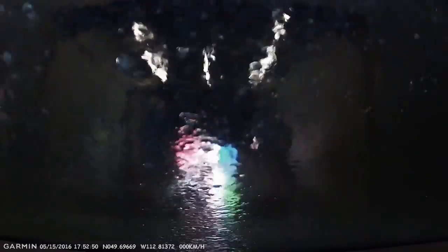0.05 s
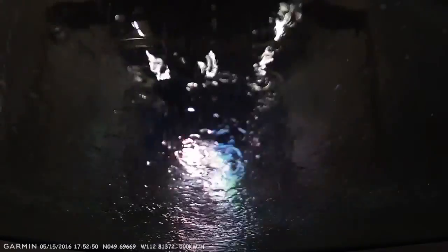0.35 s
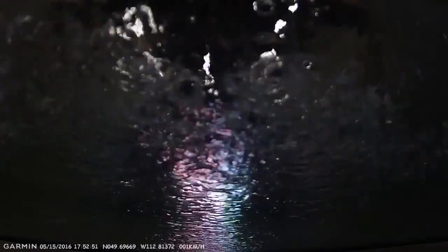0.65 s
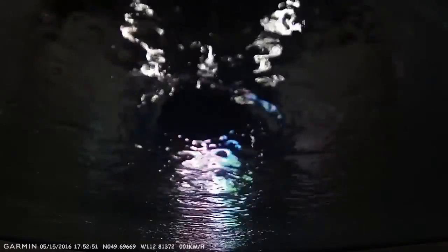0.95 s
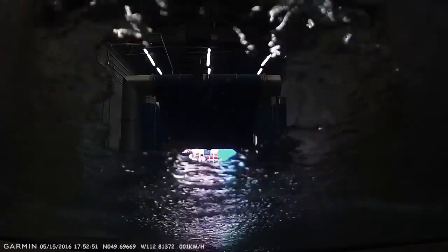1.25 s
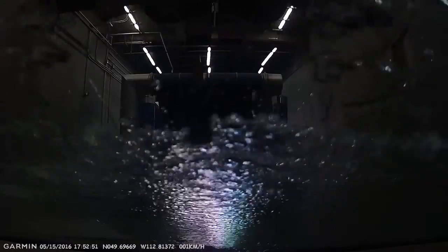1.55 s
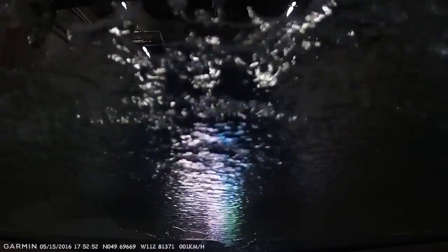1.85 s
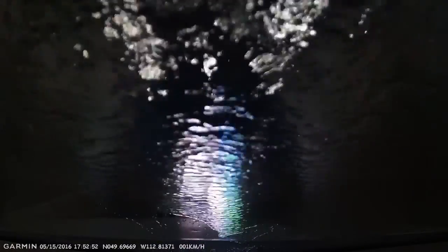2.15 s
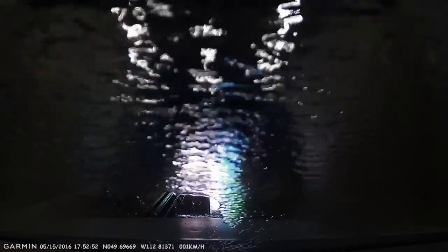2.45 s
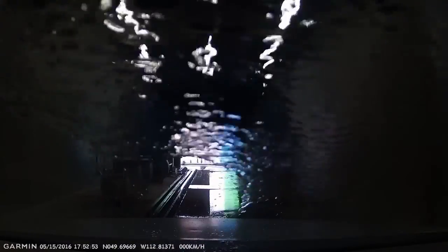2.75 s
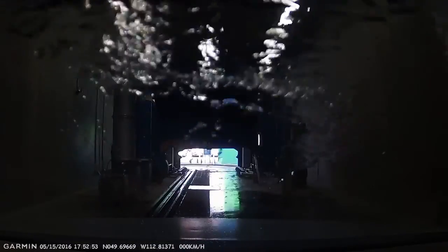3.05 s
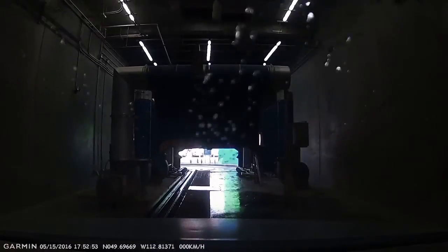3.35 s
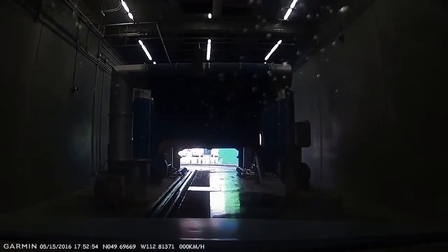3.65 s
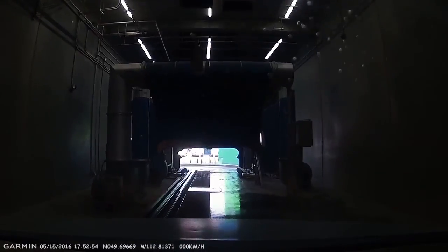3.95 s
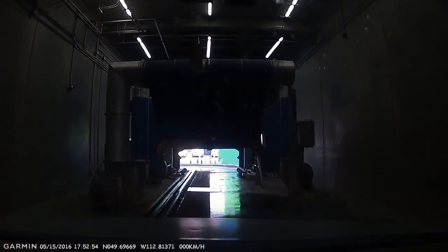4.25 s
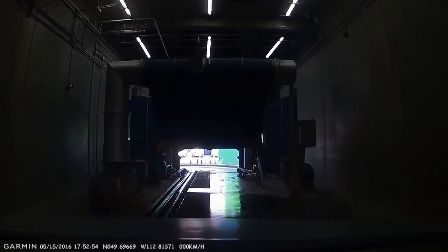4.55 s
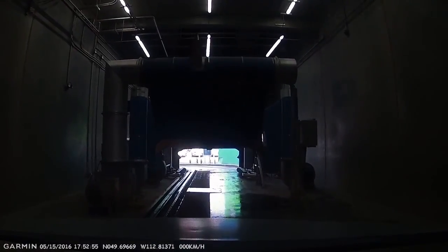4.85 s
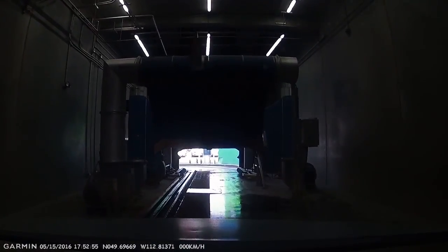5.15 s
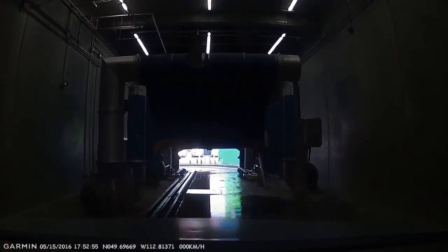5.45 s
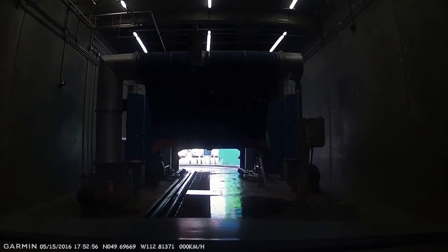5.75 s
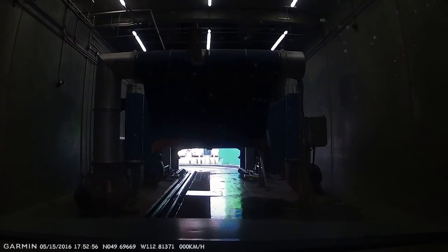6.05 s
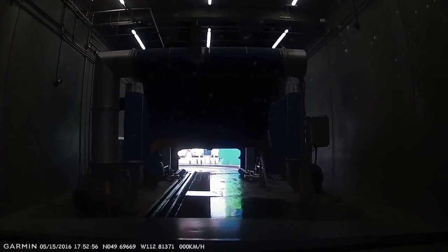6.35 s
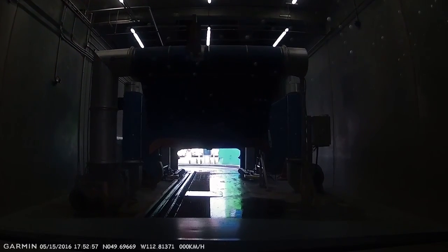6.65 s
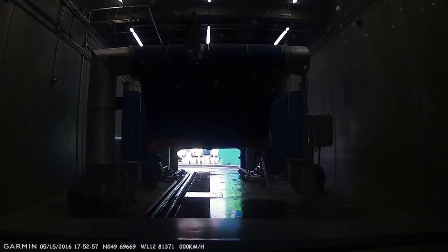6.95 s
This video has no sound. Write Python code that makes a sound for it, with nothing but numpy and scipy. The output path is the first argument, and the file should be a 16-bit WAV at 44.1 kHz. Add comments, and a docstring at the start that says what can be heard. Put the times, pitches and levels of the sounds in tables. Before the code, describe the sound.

Muffled car wash jets, a constant high hum and deep buffeting air, heard from a closed car as the dryers' low boom grows.

```python
"""Car wash, from inside the car

One microphone behind the windscreen as the car creeps out of the rinse and towards the dryers.
Out in the tunnel a blower hums on one high note and jets rush; close by, water sprays on the glass
and the air stream rumbles and thumps on the body. Faint ticks and a thin hiss come and go. As the
dryers come near, the roar over the roof grows and the cabin starts to boom on a low, throbbing drone."""
import sys
import numpy as np
from scipy import signal
from scipy.fft import rfft, irfft, next_fast_len
from scipy.io import wavfile
from scipy.ndimage import uniform_filter1d, map_coordinates

SR = 44100
rng = np.random.default_rng(int(sys.argv[2]) if len(sys.argv) > 2 else 0)


def transcribe(u):
    """Save the signal u as a 16-bit wav file named by the first command-line argument.

    u: samples, shape (n,) or (channels, n), limited to [-1, 1]; the rate is SR.
    q: integer samples, one column per channel.
    """
    v = np.clip(np.atleast_2d(u).T, -1, 1)
    q = np.round(v * 32767).astype(np.int16)
    wavfile.write(sys.argv[1], SR, q)


N = 313551

# the blower's blade note and its odd overtone: multiple, relative_db
BLADE_PARTIALS = [(1, 1), (3, -28.5)]
# quiet spots of its standing wave along the tunnel: centre_s, half_width_s, depth_db
BLADE_NULLS = [(.12, 0.13, 11.5), (.33, 0.05, 9), (.42, .045, 6.5), (.96, 0.1, 5), (1.55, 0.43, 6.5),
               (2.55, 0.11, 3.5), (2.8, 0.12, 8.5), (3.33, 0.18, 3.5), (4.12, 0.16, 9.5), (4.57, 0.16, 2),
               (5.18, 0.13, 12.5), (6.06, 0.19, 3.5), (6.5, 0.2, 1.5)]
# spots where its octave swells: centre_s, half_width_s, rise_db
OCTAVE_SWELLS = [(2.05, 0.36, 9), (3.86, 0.2, 10.5), (4.2, .12, 8), (4.6, .1, 5), (6.86, .15, 8)]
# fainter whines of other fans: pitch_hz, level_db
FAN_WHINES = [(1290, -56), (1421, -53.5), (2130, -62), (2368, -62)]

# deep buffeting as the car enters the air stream: time_s, level_db
BUFFET_LEVELS = [(0, -27), (.95, -24), (1.35, -19.5), (2.05, -19.5), (2.45, -17.7), (2.95, -20),
                 (3.45, -17), (3.9, -18), (4.1, -21), (4.35, -19), (4.8, -20), (5.3, -17.5), (5.6, -17.7),
                 (6.3, -20), (7.11, -17.5)]
# air over the roof and jets in the tunnel: time_s, relative_db
ROAR_LEVELS = [(0, -28.5), (.95, -29), (1.6, -25.5), (2.1, -24.5), (2.25, -26.3), (2.72, -26),
               (3.15, -23.5), (4, -26.5), (4.45, -27.5), (5.15, -26), (5.9, -20), (6.07, -21),
               (6.62, -19.5), (7.11, -18)]
JET_LEVELS = [(0, -35.5), (.9, -35), (1.75, -35), (1.95, -34), (2.7, -34.5), (3.35, -31.5), (3.85, -31.5),
              (4.1, -34.5), (4.9, -33), (5.1, -34), (5.5, -33), (6.7, -31.5), (7.11, -32.5)]
# the cabin's low resonances: centre_hz, half_width_hz, gain_db
CABIN_MODES = [(106, 9.1, -12.5), (124.6, 8.7, 2.5), (144.3, 7, -4.5), (179.6, 8.6, 0)]

# air and water as heard through the closed car: frequency_hz, density_db
BUFFET_SPECTRUM = [(5, -21), (14, -4), (26, -2), (46, 3.5), (59, 8), (78, 4), (90, 2.5), (105, 1),
                   (130, -4.5), (200, -29.5), (320, -83)]
ROAR_SPECTRUM = [(90, -26.5), (140, -3), (180, -0.5), (210, -1), (238, 0.5), (280, -4.5), (335, -3),
                 (420, -7.5), (510, -15.5), (700, -24.5), (1400, -78)]
JET_SPECTRUM = [(300, -6), (520, 2), (640, 3), (740, 0.5), (900, -4.5), (1100, -5.5), (1400, -8),
                (1650, -9.5), (1900, -18), (3500, -108)]
SPRAY_SPECTRUM = [(900, -8.5), (1600, -6), (2000, 5), (2450, 4.5), (2800, 2.5), (3200, 1), (3700, -5),
                  (4300, -12), (4900, -21.5), (5500, -43), (6800, -53), (15000, -64.5)]
RINSE_SPECTRUM = [(2000, -10.5), (3700, 9.5), (4700, 4), (5600, -17), (6500, -26), (9000, -43.5)]

# brief, faint high ticks in the hiss: start_s, relative_db
TICKS = [(.075, -69), (.325, -57), (.485, -56), (.785, -57), (.982, -49), (1.157, -59), (1.527, -57),
         (1.952, -51), (2.152, -56), (2.43, -63), (2.478, -49), (2.645, -58), (4.133, -56), (4.547, -59),
         (4.83, -57), (5.087, -55), (5.202, -55)]
# the colour of those ticks and of the duller patter between them: frequency_hz, density_db
TICK_SPECTRUM = [(2500, -12), (4200, 2), (5500, 5), (6100, -8), (7500, -26), (10000, -50.5)]
PATTER_SPECTRUM = [(2500, -12), (4000, 0), (5000, 0), (5500, -10), (6200, -35), (9000, -60)]
# single gusts against the body: centre_s, relative_db
GUSTS = [(1.27, -22), (1.67, -19), (3.48, -12), (4.18, -19.5), (4.919, -15), (5.28, -18.5), (5.55, -14.5),
         (5.98, -14), (6.88, -15.5)]
# a faint, thin high hiss that comes and goes: start_s, end_s, level_db
HISS_SPELLS = [(2.503, 3.827, -57), (5.52, 6.75, -56.5)]
# the colour of that hiss: frequency_hz, density_db
HISS_SPECTRUM = [(3000, -20), (4400, 6), (5300, 6), (6500, 2), (8000, 0), (12000, -1), (15800, -2.5)]
# the roof panel's resonances: centre_hz, half_width_hz, gain_db
ROOF_MODES = [(135, 20, -2), (202, 16, -4.5), (264, 9, 4.5), (316, 12, 4.5)]
# throbs of the cabin's boom: start_s, length_s, relative_db, pitch_hz
THROBS = [(5.05, .1, -14.5, 135), (5.209, 0.072, -21.5, 134), (5.293, 0.059, -15, 133.1),
          (5.412, 0.072, -20.5, 124.6), (5.581, 0.038, -6.5, 126.8), (5.633, 0.068, -12, 132.3),
          (5.776, 0.061, -11, 135), (5.895, 0.062, -5.5, 133.4), (6.157, 0.055, -15, 127.7),
          (6.249, 0.13, -15.5, 122.7), (6.43, 0.07, -11.5, 133.8), (6.534, .15, -10.5, 131),
          (6.703, 0.042, -15, 137.7), (6.887, .05, -14.5, 139.7), (6.998, 0.1, -15, 137)]

TIME_S = np.arange(N) / SR


def amp(db):
    """Decibels to gain."""
    return 10 ** (np.asarray(db) / 20)


def unit(x):
    """Scale to rms 1."""
    return x / np.sqrt(np.mean(x ** 2) + 1e-20)


def curve(points):
    """Straight lines through (time_s, value) points, one value a sample."""
    return np.interp(TIME_S, *np.transpose(points))


def passing(centre_s, half_width_s):
    """A bell curve of height 1: the car goes by a spot."""
    return np.exp(-((TIME_S - centre_s) / half_width_s) ** 2)


def wobble(per_s):
    """A smooth random curve with per_s knots a second."""
    knots = rng.standard_normal(int(N * per_s / SR) + 4)
    return map_coordinates(knots, [TIME_S * per_s])


def filtered(x, response):
    """x times a response of frequency."""
    size = next_fast_len(N + SR // 2)
    return irfft(rfft(x, size) * response(np.fft.rfftfreq(size, 1 / SR)), size)[:N]


def coloured(x, spectrum):
    """x shaped by a spectrum on a log frequency axis, at rms 1."""
    points_hz, db = np.transpose(spectrum)
    return unit(filtered(x, lambda hz: amp(np.interp(np.log(hz + 1), np.log(points_hz), db))))


def noise(spectrum):
    """Coloured noise of rms 1."""
    return coloured(rng.standard_normal(N), spectrum)


def drops(spectrum, per_s=900):
    """Fine drops as coloured clicks at random times, at rms 1."""
    hits = rng.random(N) < per_s / SR
    return coloured(hits * rng.uniform(-1.1, 1, N), spectrum)


def ringing(modes):
    """Noise of rms 1 that rings in a set of resonances."""
    response = lambda hz: sum(amp(db) / (1 + ((hz - centre) / half) ** 2) for centre, half, db in modes)
    return unit(filtered(rng.standard_normal(N), response))


def steadied(x, seconds):
    """x with its slow chance swells evened out, near rms 1."""
    return x / np.sqrt(np.abs(uniform_filter1d(x ** 2, int(seconds * SR))) + 1e-9)


def phase_of(hz):
    """Running phase of a pitch curve."""
    return 2 * np.pi * np.cumsum(hz) / SR


def scattered(phase, per_s):
    """A tone whose strength and phase drift as its many echoes add up."""
    return unit(wobble(per_s) * np.sin(phase) + wobble(per_s) * np.cos(phase))


def blower(blade_hz=592.55, rise_db_per_s=0.22, flutter_db=0.8, echo_db=-29):
    """The blade note flutters and draws nearer; standing waves swell and fade it and its octave."""
    dips_db = sum(depth * passing(s, half) for s, half, depth in BLADE_NULLS)
    note_db = -28 + rise_db_per_s * TIME_S - dips_db + flutter_db * wobble(18)
    octave_db = -57 + sum(rise * passing(s, half) for s, half, rise in OCTAVE_SWELLS)
    phase = phase_of(blade_hz + 0.29 * wobble(1.963))
    partial = lambda k: np.sqrt(2) * np.sin(k * phase) + amp(echo_db) * scattered(k * phase, per_s=34)
    note = sum(amp(db) * partial(k) for k, db in BLADE_PARTIALS)
    return amp(note_db) * note + amp(octave_db) * partial(2)


def fans():
    """Other fans whine faintly, reaching the car as a blur of echoes."""
    return sum(amp(db) * scattered(2 * np.pi * hz * TIME_S, per_s=12) for hz, db in FAN_WHINES)


def buffeting(gust_db=0.8):
    """Turbulent air shakes the body panels all round the microphone."""
    level_db = curve(BUFFET_LEVELS) + gust_db * wobble(6.8)
    return amp(level_db) * steadied(noise(BUFFET_SPECTRUM), seconds=0.14)


def cabin_rumble(start_db=-28, rise_db_per_s=1.07):
    """The air stream stirs the cabin's low resonances, harder as the car goes on."""
    return amp(start_db + rise_db_per_s * TIME_S) * steadied(ringing(CABIN_MODES), seconds=0.23)


def air_roar(gain_db=1.0):
    """Air roars over the roof, louder towards the dryers."""
    level_db = curve(ROAR_LEVELS) + gain_db + 0.72 * wobble(11)
    return amp(level_db) * steadied(noise(ROAR_SPECTRUM), seconds=0.12)


def jets(gain_db=2.5):
    """Jets rush out in the tunnel, muffled by the closed car."""
    return amp(curve(JET_LEVELS) + gain_db + 0.2 * wobble(11)) * noise(JET_SPECTRUM)


def spray(start_db=-44.5, rise_db_per_s=0.5, drops_db=-8):
    """Slowly thickening spray lands just ahead of the microphone, dulled by the glass."""
    curtain_db = 1.6 * passing(2.76, 0.65)  # a dense curtain crosses the windscreen
    level_db = start_db + rise_db_per_s * TIME_S + curtain_db + 0.22 * wobble(8.2)
    return amp(level_db) * unit(noise(SPRAY_SPECTRUM) + amp(drops_db) * drops(SPRAY_SPECTRUM))


def rinse(start_db=-61.5, clear_s=2.8, fade_db_per_s=18, burst_db=3.5):
    """A sheet of water splatters on the windscreen in uneven bursts until the car clears it."""
    level_db = start_db - fade_db_per_s * np.maximum(TIME_S - clear_s, 0)
    return amp(level_db + burst_db * np.tanh(wobble(20))) * drops(RINSE_SPECTRUM)


def high_ticks(attack_s=0.011, decay_s=0.024, patter_per_s=18, spread_db=1.8):
    """Brief, faint high ticks sound in the hiss, with a duller random patter between them."""
    pulse = lambda age: (1 - np.exp(-age / attack_s)) * np.exp(-age / decay_s)
    ticks = sum(amp(db) * pulse(np.maximum(TIME_S - start, 0)) for start, db in TICKS)
    onsets = rng.random(N) < patter_per_s / SR
    impulses = onsets * amp(-61.5 + spread_db * rng.standard_normal(N))
    patter_power = signal.fftconvolve(impulses ** 2, pulse(TIME_S[:SR // 2]) ** 2)[:N]
    return ticks * noise(TICK_SPECTRUM) + np.sqrt(np.abs(patter_power)) * noise(PATTER_SPECTRUM)


def gust_thumps(body_hz=65.9, half_width_s=0.029, gain_db=0.5):
    """Each heavy gust shoves the body, which swings a few times at its lowest resonance."""
    swing = lambda: np.sqrt(2) * np.sin(2 * np.pi * (body_hz * TIME_S + rng.random()))
    return sum(amp(db + gain_db) * passing(s, half_width_s) * swing() for s, db in GUSTS)


def thin_hiss(fade_s=0.02):
    """A faint, thin high hiss comes and goes."""
    gate = lambda start, end: np.clip(np.minimum(TIME_S - start, end - TIME_S) / fade_s, 0, 1)
    return sum(amp(db) * gate(start, end) for start, end, db in HISS_SPELLS) * noise(HISS_SPECTRUM)


def roof_drumming(centre_s=3.13, half_width_s=0.23, level_db=-22):
    """The roof panel drums overhead while a jet crosses it."""
    return amp(level_db) * passing(centre_s, half_width_s) * steadied(ringing(ROOF_MODES), seconds=0.14)


def cabin_boom(attack_s=0.03, release_s=0.04, drone_rise_s=0.8, waver_hz=2.4, rough_db=-15, gain_db=-1):
    """The dryer's stream excites one low cabin resonance: throbs swell and die over a weak drone."""
    ramp = lambda u: np.clip(u + 0.5, 0, 1)
    throbs = sum(amp(db) * ramp((TIME_S - start) / attack_s) * ramp((start + length - TIME_S) / release_s)
                 for start, length, db, _ in THROBS)
    drone = amp(-22.5) * ramp((TIME_S - THROBS[0][0]) / drone_rise_s)
    pitch_hz = curve([(start + length / 2, hz) for start, length, _, hz in THROBS])
    phase = phase_of(pitch_hz + waver_hz * wobble(22))
    tone = np.sqrt(2) * np.sin(phase) + amp(rough_db) * scattered(phase, per_s=44)
    return amp(gain_db) * np.hypot(throbs, drone) * tone


def scene():
    """The mono mix, heard from behind the windscreen."""
    machines = blower() + fans()
    air = buffeting() + cabin_rumble() + air_roar()
    water = jets() + spray() + rinse()
    events = high_ticks() + gust_thumps() + thin_hiss() + roof_drumming() + cabin_boom()
    return (machines + air + water + events)[None]


def record(dry, ceiling=0.96, top_hz=15800):
    """The recorder rounds off the highest peaks and keeps nothing above its band limit."""
    rounded = dry / (1 + np.abs(dry / ceiling) ** 10) ** (1 / 10)
    return signal.sosfilt(signal.ellip(10, 0.1, 90, top_hz, fs=SR, output="sos"), rounded)


dry = scene()
out = record(dry)
transcribe(out)
```